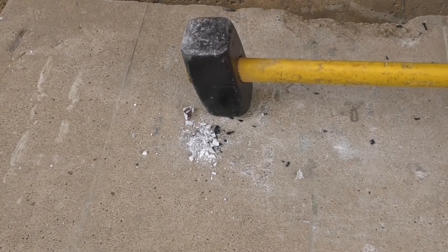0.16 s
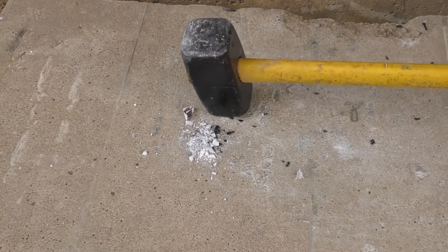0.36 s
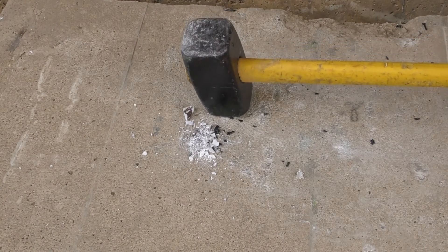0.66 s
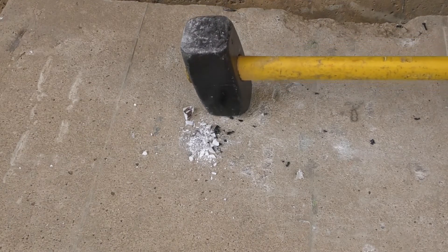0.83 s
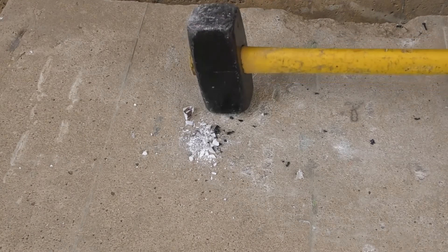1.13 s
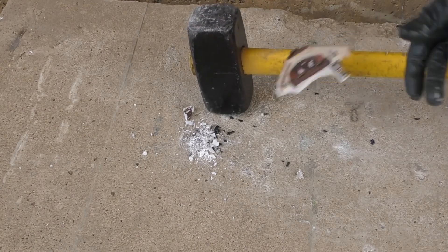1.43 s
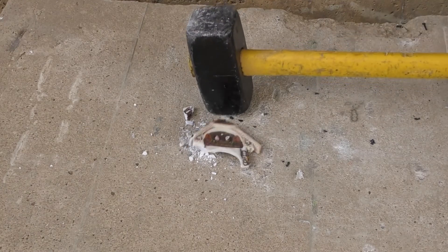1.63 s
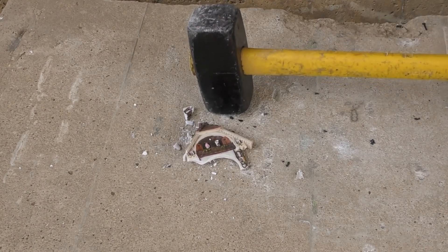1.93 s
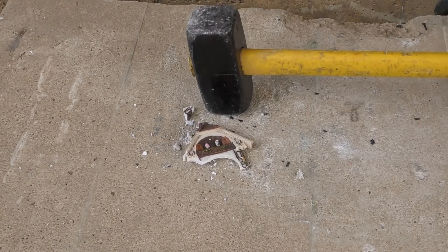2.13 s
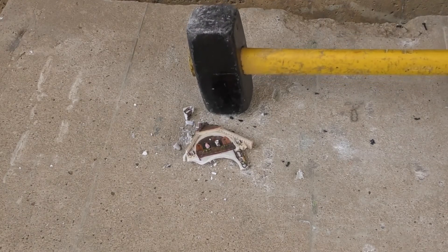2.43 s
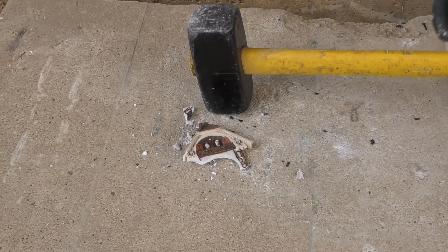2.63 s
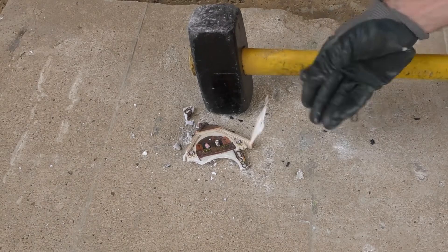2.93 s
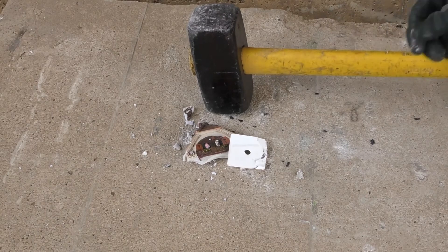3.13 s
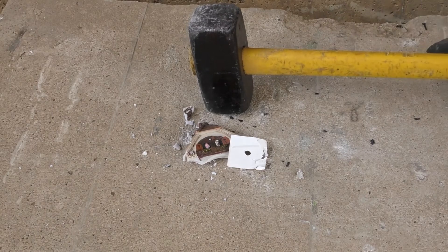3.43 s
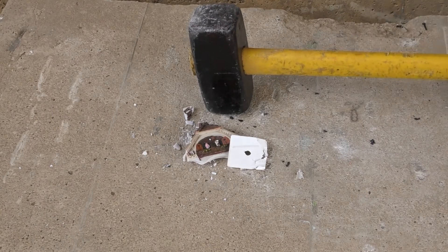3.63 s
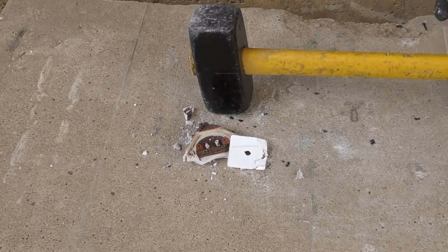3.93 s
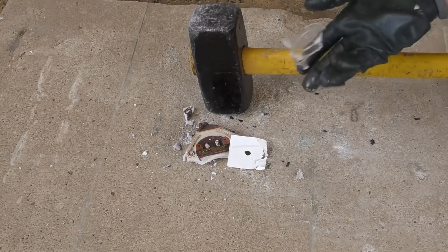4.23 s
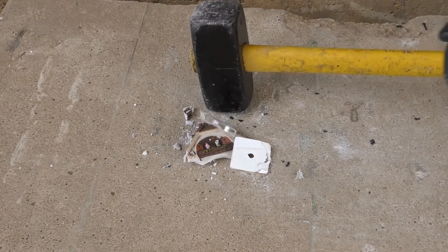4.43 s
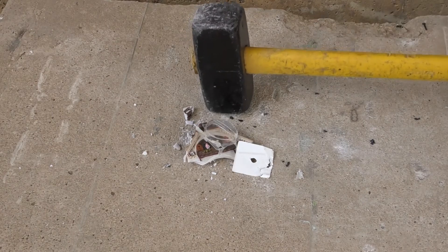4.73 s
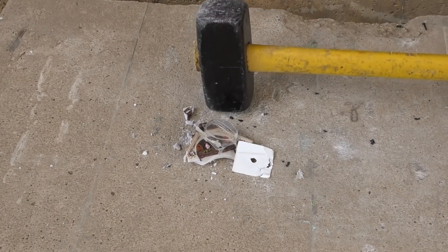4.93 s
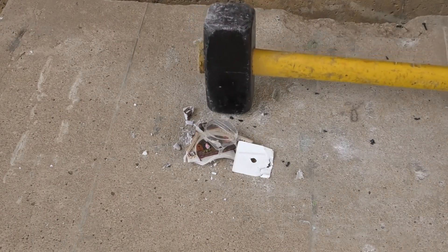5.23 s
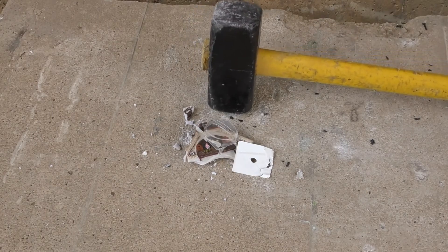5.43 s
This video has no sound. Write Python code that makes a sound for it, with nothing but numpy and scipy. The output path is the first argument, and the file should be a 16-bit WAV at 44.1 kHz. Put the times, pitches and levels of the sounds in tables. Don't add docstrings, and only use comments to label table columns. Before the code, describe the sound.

Broken plastic and ceramic scraps clack and rattle onto concrete in separate drops, over faint glove rustle and low distant traffic rumble.

```python
import sys
import numpy as np
from scipy import signal
from scipy.io import wavfile
from scipy.ndimage import uniform_filter1d

SR = 44100
rng = np.random.default_rng(int(sys.argv[2]) if len(sys.argv) > 2 else 0)


def to_wav(sig):
    pcm = np.clip(np.atleast_2d(sig), -1, 1) * 32767
    pcm = np.round(pcm).astype(np.int16)
    wavfile.write(sys.argv[1], SR, pcm.T)


def field_ratio(decibels):
    return 10 ** (np.asarray(decibels, dtype=float) / 20)


N = 246078

# t/s, level/dB
TRAFFIC_LEVEL = [(0, -37), (.25, -37), (.59, -32.5), (.9, -41.5), (1.41, -37.5), (1.46, -37.5), (1.57, -38),
                 (1.61, -47), (2.5, -46), (2.94, -42), (3.6, -40), (3.95, -37), (4.21, -35), (4.27, -33.5),
                 (4.4, -38.5), (4.62, -40), (4.69, -35.5), (4.82, -40), (5.58, -42.5)]
# t/s, level/dB
HEAVY_LEVEL = [(0, 10.5), (.17, -8.5), (.5, -3), (.95, 6), (1.3, -2), (1.75, 2.5), (2.45, -6), (2.75, 2),
               (3.0, -4), (3.25, 2.5), (3.6, 1), (3.72, -10), (4.15, -3), (4.35, -1.5), (4.75, -1.5),
               (4.92, -6), (5.3, -2.5), (5.5, 7)]
# f/Hz, density/dB per Hz
RUMBLE_SPECTRUM = [(8.2, -48), (14, -24), (21, -28), (37, 8), (48, -15), (92, 2), (118, -7.5), (198, 0.5),
                   (316, -7), (380, -22.5), (420, -36.5), (550, -41), (920, -120)]
# f/Hz, density/dB per Hz
ROAD_SPECTRUM = [(350, -73), (590, -19.5), (677, -7.5), (800, -14.5), (986, -3.5), (1160, -6), (1360, -4),
                 (1490, -4.5), (1620, -13.5), (1770, -8.5), (1900, -11.5), (2470, -16), (4180, -120)]
# f/Hz, density/dB per Hz
HOLLOW_SPECTRUM = [(380, 6), (430, -4.5), (580, -1), (700, 5.5)]
# t/s, strength/1, gate hold/s
DUCKS_AFTER_DROPS = [
    (1.601, 0.86, 2.2),
    (4.441, 0.22, 0.024),
]
# t/s, activity level/dB, pressure/dB (harder = coarser)
GLOVE_MOTION = [(0, -31, -7.5), (.3, -47, -3.5), (.41, -24, -9), (.56, -44.5, -5.5), (.78, -41, -8),
                (.86, -47.5, -6), (1.37, -47, -8), (1.62, -53, -7), (1.75, -45, 1), (1.95, -60.5, -12),
                (2.27, -39.5, -11.5), (2.58, -55.5, -4.5), (3.2, -52, -3.5), (3.56, -44.5, -5),
                (3.86, -49.5, -8.5), (4.05, -48.5, -4.5), (4.48, -52, -3), (4.6, -38.5, -2.5),
                (4.85, -53, -1.5), (5.4, -49.5, -2.5)]
# t/s, length/s, fine level/dB, coarse level/dB re fine
GLOVE_STROKES = [(0.402, 0.032, -21, -16), (.425, 0.038, -29, -11), (.49, 0.15, -39, -25),
                 (0.648, .14, -34, -7.5), (0.778, 0.087, -43, -2), (0.893, 0.071, -39, -13),
                 (1.029, 0.072, -45, -9), (1.606, 0.056, -44.5, 6), (1.637, 0.078, -53, -11),
                 (2.112, 0.03, -45, -23), (2.27, 0.1, -39, -9), (2.367, 0.083, -44.5, -8),
                 (2.515, 0.076, -43, -9), (2.6, 0.067, -51, -5), (2.824, 0.077, -46.5, -8),
                 (3.23, 0.056, -51, -19), (3.39, 0.15, -36.5, -8), (3.547, 0.067, -50, -1),
                 (3.638, 0.074, -35.5, -6.5), (3.78, 0.042, -43.5, -8), (3.927, 0.035, -46, -3.5),
                 (4.467, 0.037, -33, -1), (4.455, 0.12, -38, -0.5), (4.625, 0.13, -40.5, -18),
                 (4.92, 0.12, -45, -8), (5.115, 0.066, -48, -21), (5.184, 0.12, -48, -10),
                 (5.393, 0.061, -46, -1)]
# f/Hz, density/dB per Hz
FINE_SPECTRUM = [(4120, -25), (7700, -9.5), (9500, -0.5), (11000, 1), (15000, -6), (15850, -9),
                 (15950, -60), (16500, -80)]
COARSE_SPECTRUM = [(1940, -4), (3300, 7.5), (3950, 8.5), (4250, 6.5), (4750, 3.5), (5300, 7), (5750, 5.5),
                   (6400, 0.5), (7300, 3.5), (9360, 5.5), (15800, -120)]
DULL_SPECTRUM = [(1060, -13.5), (1800, 2.5), (2440, 6.5), (2680, 6.5), (2910, 6.5), (3400, -7.5),
                 (4420, -41), (7480, -120)]
# t/s, length/s, f/Hz, width/Hz, level/dB
RATTLES_AND_BUMPS = [(.47, .105, 6150, 170, -41), (.062, .022, 2400, 300, -29), (1.612, .023, 4400, 910, -36),
                     (1.617, .016, 5300, 250, -32), (4.572, .026, 2250, 120, -35),
                     (4.604, .034, 3200, 1300, -37), (1.86, .25, 2500, 700, -51), (.42, .05, 6200, 250, -37),
                     (.6, .07, 2860, 160, -44.5), (.77, .05, 2860, 490, -41.5), (4.3, .12, 1030, 57, -39.5),
                     (.25, .038, 560, 500, -40), (1.085, .065, 215, 5.9, -29), (4.49, .09, 3500, 1100, -41),
                     (.47, .15, 2100, 900, -37), (1.15, .1, 2200, 500, -48), (1.37, .16, 1880, 160, -45),
                     (4.66, .097, 5500, 2700, -45), (2.44, .17, 1050, 260, -49.5), (.46, .13, 10100, 600, -40),
                     (.48, .16, 2880, 220, -41.5), (.396, .014, 3700, 150, -31), (.396, .03, 2500, 200, -34),
                     (.404, .022, 5300, 200, -34), (4.525, .045, 6800, 2500, -44),
                     (4.475, .025, 3400, 900, -37), (4.05, .05, 85, 20, -33), (5.4, .05, 250, 50, -34),
                     (5.04, .07, 70, 20, -38), (.02, .02, 700, 500, -33), (.93, .12, 250, 40, -38),
                     (.86, .38, 1080, 150, -44), (.99, .08, 1950, 200, -47), (.25, .11, 1100, 200, -43),
                     (0, .03, 6500, 900, -40), (3.43, .08, 4050, 250, -48), (3.56, .05, 4050, 250, -50),
                     (3.64, .05, 4050, 250, -47), (5.412, .022, 5200, 2200, -36), (2.29, .17, 5400, 600, -54),
                     (1.95, .3, 2950, 450, -56), (.376, .1, 6250, 200, -41), (.375, .03, 10000, 500, -37)]
# t/s, level/dB
GRIT_TICKS = [(.004, -54), (.2064, -53), (0.247, -42), (.3167, -44), (.9048, -43.5), (1.043, -44),
              (1.2305, -49), (1.3845, -44.5), (2.1314, -50), (2.175, -61), (2.5326, -50), (3.2024, -60),
              (3.3565, -48), (3.7973, -44.5), (3.945, -55), (4.1175, -47), (4.8903, -43), (4.946, -50),
              (5.1357, -48)]
# t/s, body level/dB, f/Hz, edge level/dB re body, ring/ms
GATHERED_CONTACTS = [(.0329, -11, 2360, -25, 26), (.033, -12.5, 2800, -29, 22), (.031, -20, 6830, 8, 18),
                     (.0332, -11, 1600, -21, 22), (.0692, -22, 2280, -18, 33), (.0895, -25, 2370, -17, 65),
                     (.1048, -29, 5000, -3, 28), (.105, -25.5, 8600, -13, 30), (.1459, -33, 2350, -17, 59),
                     (.1699, -31.5, 6440, 9, 29), (.170, -29.5, 4080, -15, 32), (.354, -34, 5300, 8, 30),
                     (.3733, -25, 3700, -3, 17), (.3744, -17.5, 6380, 3.5, 28), (.3975, -19, 7000, -1, 39),
                     (.4012, -26, 3700, 11, 40), (.404, -25, 2460, 12, 37), (.4067, -23, 5430, 16, 37),
                     (.4095, -38, 7000, 19, 15), (.4122, -14, 6200, -2, 49), (.4134, -22, 3650, 4, 43),
                     (.4175, -28, 5400, 4, 30), (.4228, -24, 5530, 12, 25), (.429, -30, 6200, 6, 20),
                     (.4412, -20, 2500, 3, 18), (.4448, -36, 6140, 16, 30), (.449, -28, 6200, 0, 35),
                     (.4604, -21, 6200, 8, 26), (.461, -27, 3700, -15, 20), (.595, -26, 1970, -6, 53),
                     (.652, -24, 6340, -6, 29), (.6612, -20.5, 2820, 1, 48), (.7475, -10, 5660, -8, 25),
                     (.7476, -17.5, 2030, -16, 30), (.7476, -11.5, 11800, -11, 25),
                     (.7476, -14, 2860, -20, 30), (.7837, -30, 2960, -3, 31), (1.0815, -42, 6400, -12, 30),
                     (1.252, -36.5, 3030, -12, 38), (1.279, -55, 6000, 12, 30), (1.292, -62, 6000, 8, 30)]
# t/s, body level/dB, f/Hz, edge level/dB re body, ring/ms
BIG_CONTACTS = [(1.5648, -20, 4930, 0, 16), (1.565, -24, 1410, -20, 18), (1.5654, -21, 2880, -11, 17),
                (1.5672, -18, 5270, -10, 22), (1.5729, -11.5, 2750, -12, 48), (1.5732, -8, 2270, -22, 30),
                (1.5822, -5, 3120, -7.5, 18), (1.5865, -4.5, 5200, -4, 11), (1.587, -7, 6660, -18, 22),
                (1.5917, -15, 2480, -25, 20), (1.5922, -13, 5200, -6, 11), (1.5935, -28, 3060, -17, 48),
                (1.6132, -26, 4100, -17, 11), (1.6158, -23, 3470, -15, 19), (1.6176, -32, 4800, -11, 10),
                (1.6195, -27, 3400, -15, 23), (1.6238, -24, 5300, -10, 33), (1.627, -24.5, 5070, -13, 29),
                (1.631, -31, 3220, -2, 19), (1.702, -51, 3000, 22, 19), (1.72, -31, 5200, 1, 23),
                (1.746, -43, 5340, 18, 30), (1.7995, -45.5, 5400, 28.5, 20), (2.3072, -36, 5427, 9.5, 19),
                (2.355, -42, 5660, 11, 26), (2.4054, -38, 5230, 4, 19)]
# t/s, body level/dB, f/Hz, edge level/dB re body, ring/ms
PLATE_CONTACTS = [(3.009, -22.5, 3570, -2, 18), (3.0093, -40, 3030, -17, 18), (3.0257, -30, 4040, 2, 22),
                  (3.0405, -40, 3950, -15, 28), (3.0528, -34, 4240, 12.5, 25), (3.063, -41, 4000, -15, 24),
                  (3.0834, -41, 2130, 0, 31), (3.1137, -38, 2000, -4, 28), (3.3293, -47.5, 2290, 13, 12),
                  (3.3622, -39, 3500, 3, 16), (3.3916, -36, 3570, 2, 15), (3.395, -33, 3540, 0, 22),
                  (3.665, -40, 3940, -1, 16), (3.672, -42, 5300, 4, 16), (3.677, -40, 4000, 4, 12),
                  (3.706, -53, 4000, 12, 20)]
# t/s, body level/dB, f/Hz, edge level/dB re body, ring/ms
LAST_CONTACTS = [(4.4292, -18.5, 5500, 4, 41), (4.4297, -29, 3120, -15, 42), (4.433, -26, 4370, 5, 35),
                 (4.4368, -19, 7500, 12, 18), (4.4388, -12, 3190, 3, 46), (4.439, -15, 5170, -15, 17),
                 (4.4412, -13, 7300, 0, 20), (4.4436, -12.5, 7420, -3, 23), (4.444, -14.5, 3210, -1, 33),
                 (4.4425, -18, 1580, -19, 18), (4.4475, -15.5, 4500, -4, 20), (4.4505, -21.5, 5670, 3, 62),
                 (4.453, -33, 3020, 0, 27), (4.485, -31, 6400, -5, 40), (4.487, -27, 3300, -7, 32),
                 (4.5174, -27.5, 6660, 9, 40), (4.5694, -26, 4200, 10, 42), (4.57, -16.5, 3450, -4, 10),
                 (4.571, -19.5, 6750, -12, 31), (4.6044, -25, 2980, -6, 42), (4.6085, -23, 2920, -4, 26),
                 (4.624, -30, 2900, -8, 33), (5.4035, -42, 5100, 5, 30), (5.414, -41, 5550, 2, 27),
                 (5.4235, -32, 4280, -9, 38), (5.427, -26.5, 5520, -8, 29)]
# t/s, level/dB, push/ms, pull/ms
AIR_PUSHES = [
    (1.5738, -12.5, 0.35, 2.75),
    (1.583, -11, 1.1, 3.9),
    (1.5872, -21, 2.4, 3),
    (1.596, -47, 4.8, 32),
    (0.62, -25.5, 3.8, 8.2),
    (.0325, -30, 0.42, 0.61),
    (4.442, -30, 0.75, 3),
]
# t/s, level/dB, f/Hz
EDGE_SNAPS = [(.4015, -11, 11000), (.4075, -10, 9500), (.4235, -12, 11500), (.4454, -18, 10500),
              (.7481, -8, 8500), (1.5736, -4, 12500), (1.5741, -7, 14400), (1.5827, -3, 12000),
              (1.5832, -5, 14400), (2.3074, -24, 9000), (4.118, -32, 6000), (4.4296, -2, 13000),
              (4.4302, -10, 14500), (4.4392, -7, 11000), (4.4446, -3, 13500), (4.5708, -12, 8000),
              (4.5702, -18, 14500), (.105, -26, 6500), (3.053, -26, 9000), (.4611, -13, 12000),
              (.4137, -10, 11500), (.4328, -20, 9000), (1.7465, -29, 11000), (1.7998, -20, 12000),
              (.17, -29, 9500), (.3748, -16, 11000), (3.3295, -33, 9000)]
# f/Hz, width/Hz, level/dB
SHELL_MODES = [(2380, 300, -47.5), (2800, 23, -43.5), (3020, 106, -41), (3270, 50, -48), (4280, 210, -50.5),
               (5280, 200, -42), (6740, 430, -50.5), (9800, 850, -44), (3700, 3100, -55)]
# f/Hz, density/dB per Hz
CAR_SPECTRUM = [(1900, -42), (2900, -1.5), (4160, 3.5), (5300, -5), (5900, -34), (7000, -60)]

ROAD_DB, ROAD_FOLLOW, HOLLOW_DB, HOLLOW_FOLLOW = -46, 0.6, -54.5, 0.04
RUMBLE_DUCK_DB, RUMBLE_BACK_S, ROAD_DUCK_DB, ROAD_BACK_S = 30, 0.1, 40.5, 0.23
GATE_DB, GATE_BACK_S, HEAVY_HZ, GUST_DB = 28, 0.84, 153, 1
DULL_DB, DULL_FOLLOW, DULL_PRESS = -54, 0.93, 0.72
GRIT_HZ, GRIT_EDGE_DB, GRIT_RING_MS = 2000, 9.5, 56
GATHERED_SIDE, BIG_SIDE, PLATE_SIDE, LAST_SIDE, GRIT_SIDE = 0.19, 0.28, 0.84, 0.47, 0.53
PORT_HZ, PORT_WIDTH_HZ = 10320, 1640
SNAP_MS, SHELL_S, SHELL_RESTS_S = 3.5, 1.6, 0.26
ENGINE_S, ENGINE_DB, ENGINE_RISE_DB_S, ENGINE_FALL_DB_S = 3.69, -40, 15.5, 72
ENGINE_HZ, ENGINE_SAG_HZ_S = 56.6, 0.555
CAR_S, CAR_DB, CAR_RISE_DB_S, CAR_FALL_DB_S = 3.94, -52.5, 10, 2.5


def evened(x):
    return x / np.sqrt(np.mean(x ** 2) + 1e-20)


def add(mix, s, sound):
    part = mix[max(round(s * SR), 0):][:len(sound)]
    part += sound[:len(part)]


def curve(rows, index):
    rows = np.array(rows)
    return np.interp(np.arange(N) / SR, rows[:, 0], rows[:, index])


def resonate(x, hz, width_hz):
    r = np.exp(-np.pi * width_hz / SR)
    return signal.lfilter([1, 0, -1], [1, -2 * r * np.cos(2 * np.pi * hz / SR), r * r], x)


def noise(spectrum, size, patchy_db, flicker_db, grain_db=0.):
    hop = size // 4
    frames, hz = N // hop + 5, np.fft.rfftfreq(size, 1 / SR)
    grains = field_ratio(grain_db * np.minimum(rng.exponential(1, frames * hop), 5))
    source = rng.standard_normal(frames * hop) * grains
    z = signal.stft(source, nperseg=size, noverlap=size - hop)[2]
    patches = uniform_filter1d(rng.standard_normal(z.shape), size=5, axis=0)
    patches = evened(uniform_filter1d(patches, size=10, axis=1))
    flicker = evened(uniform_filter1d(rng.standard_normal(z.shape[1]), size=8))
    f, db = np.transpose(spectrum)
    colour = np.interp(np.log(hz + 1), np.log(f), db, -120, -120)
    z = z * field_ratio(colour[:, None] + patchy_db * patches + flicker_db * flicker)
    return evened(signal.istft(z, nperseg=size, noverlap=size - hop)[1][:N])


def traffic():
    t, swing = np.arange(N) / SR, curve(TRAFFIC_LEVEL, index=1) + 40
    rumble_db = swing - 38.5
    road_db = ROAD_DB + ROAD_FOLLOW * swing
    gate = np.zeros(N)
    for s, strength, hold_s in DUCKS_AFTER_DROPS:
        since = np.maximum(t - s, 0)
        ducked = strength * (t > s)
        rumble_db = rumble_db - ducked * RUMBLE_DUCK_DB * np.exp(-since / RUMBLE_BACK_S)
        road_db = road_db - ducked * ROAD_DUCK_DB * np.exp(-since / ROAD_BACK_S)
        gate += (since > 0) * np.clip(1 - (since - hold_s) / (ducked * GATE_BACK_S + 1e-9), 0, 1)
    hollow_db = HOLLOW_DB + HOLLOW_FOLLOW * swing - GATE_DB * gate
    rumble = field_ratio(rumble_db) * noise(RUMBLE_SPECTRUM, size=2048, patchy_db=.9, flicker_db=3.4)
    deep = signal.sosfiltfilt(signal.butter(2, HEAVY_HZ, fs=SR, output="sos"), rumble)
    rumble = rumble + (field_ratio(curve(HEAVY_LEVEL, index=1)) - 1) * deep
    road = field_ratio(road_db) * noise(ROAD_SPECTRUM, size=1024, patchy_db=2.0, flicker_db=0.55)
    hollow = field_ratio(hollow_db) * noise(HOLLOW_SPECTRUM, size=2048, patchy_db=0.5, flicker_db=-3.2)
    return rumble + road + hollow


def rustle():
    busy, press = curve(GLOVE_MOTION, index=1), curve(GLOVE_MOTION, index=2)
    dull_db = DULL_DB + DULL_FOLLOW * (busy + 45) + DULL_PRESS * (press + 7)
    power = field_ratio(2 * np.array([busy - 1.5, busy + press, dull_db]))
    for s, length_s, fine_db, coarse_re_fine_db in GLOVE_STROKES:
        stroke = signal.windows.tukey(round(max(length_s, .01) * SR), .8) ** 2
        coarse_db = fine_db + coarse_re_fine_db
        for layer, db in zip(power, (fine_db, coarse_db, coarse_db - 7.0)):
            add(layer, s, field_ratio(2 * db) * stroke)
    fine = noise(FINE_SPECTRUM, size=256, patchy_db=1.7, flicker_db=1.5, grain_db=3)
    coarse = noise(COARSE_SPECTRUM, size=512, patchy_db=2.8, flicker_db=1.5, grain_db=2.6)
    dull = noise(DULL_SPECTRUM, size=512, patchy_db=.7, flicker_db=.6)
    return (np.sqrt(power) * [fine, coarse, dull]).sum(0)


def rattles():
    out = np.zeros(N)
    for s, length_s, hz, width_hz, db in RATTLES_AND_BUMPS:
        shake = resonate(rng.standard_normal(SR // 2), hz, width_hz)
        shake = evened(resonate(shake, hz, 2 * width_hz))[:round(length_s * SR)]
        fade = signal.windows.tukey(len(shake), .6) * np.linspace(1.2, .5, len(shake))
        add(out, s, field_ratio(db) * shake * fade)
    return out


def clack(body_db, hz, edge_db, ring_ms, side):
    noises, spread = rng.standard_normal((2, 2600)), rng.uniform(1.0, 1.01, size=10)
    t = np.arange(2600) / SR
    t60 = np.clip(ring_ms / 1000, .004, .1)
    rise = np.minimum(t / 0.0003, 1)
    blow = np.exp(-t / 0.0003)
    chatter = noises[0] * rise * (blow + 1.6 * field_ratio(-60 * t / (0.9 * t60)))
    chatter[4] += 14
    ring = resonate(chatter, hz, 4.2 / t60 + 60)
    neighbours = np.clip(hz * np.array([.72, .86, 1.2, 1.45, 1.8]) * spread[:5], 1400, 7500)
    others = sum(resonate(chatter, f, 1400) for f in neighbours)
    body = ring / abs(ring).max() + side * others / abs(others).max()
    body = body * np.exp(-(t / (.33 * t60)) ** 3)
    fizz = noises[1] * rise * (blow + 0.36 * field_ratio(-60 * t / (0.65 * t60)))
    fizz[4] += 1.5
    stiff_hz = np.array([10100, 10300, 9400, 11800, 12600]) * spread[5:]
    slivers = sum(resonate(fizz, f, 350) for f in stiff_hz)
    port = resonate(fizz, PORT_HZ, PORT_WIDTH_HZ)
    air = resonate(resonate(fizz, 11000, 5000), 11800, 9900)
    edge = evened(port) + 0.4 * evened(air) + 0.28 * evened(slivers)
    return field_ratio(body_db + 2.3) * body + field_ratio(body_db + edge_db + 7.0) * edge / abs(edge).max()


def contacts():
    out = np.zeros(N)
    grit = [(s, db, GRIT_HZ, GRIT_EDGE_DB, GRIT_RING_MS) for s, db in GRIT_TICKS]
    heaps = [(GATHERED_CONTACTS, GATHERED_SIDE), (BIG_CONTACTS, BIG_SIDE), (PLATE_CONTACTS, PLATE_SIDE),
             (LAST_CONTACTS, LAST_SIDE), (grit, GRIT_SIDE)]
    for heap, side in heaps:
        for s, body_db, hz, edge_db, ring_ms in heap:
            add(out, s + .0005, clack(body_db, hz, edge_db, ring_ms, side))
    return out


def yard(x):
    at = np.arange(150, SR // 2, 22)
    signs = rng.choice([-1., 1.], len(at))
    taps = np.zeros(SR)
    taps[at + rng.integers(0, 22, len(at))] = signs * field_ratio(-60 * at / SR / 1.3)
    return signal.fftconvolve(x, taps / np.linalg.norm(taps))[:N]


def air_pushes():
    out, t = np.zeros(N), np.arange(SR) / SR
    onset = np.sin(np.pi / 2 * np.minimum(t / 0.00065, 1)) ** 2
    for s, db, push_ms, pull_ms in AIR_PUSHES:
        swing = (1 - 1000 * t / push_ms) * np.exp(-(1000 * t / pull_ms) ** 2)
        add(out, s, field_ratio(db) * swing * onset)
    return out


def snaps():
    out, t = np.zeros(N), np.arange(400) / SR
    for s, db, hz in EDGE_SNAPS:
        turn = 2 * np.pi * hz * t
        crack = np.sin(turn) + 0.37 * np.sin(0.694 * turn) + 0.33 * np.sin(1.1 * turn)
        add(out, s, field_ratio(db - 60000 * t / SNAP_MS) * crack / 1.4)
    return out


def shell():
    out, t = np.zeros(N), np.arange(SR) / SR
    for hz, width_hz, db in SHELL_MODES:
        t60 = 2.2 * (3000 / hz) ** 0.2
        rests_s = SHELL_RESTS_S * (3000 / hz) ** 0.83 + 0.22
        wobble_db = 3.4 * evened(uniform_filter1d(rng.standard_normal(SR), size=900))
        ring = resonate(rng.standard_normal(SR), hz, width_hz)
        ring = evened(resonate(ring, hz, 3 * width_hz))
        envelope = np.minimum(t / 0.025, 1) / (1 + (t / rests_s) ** 6)
        add(out, SHELL_S, ring * field_ratio(db + wobble_db - 60 * t / t60) * envelope)
    return out


def engine():
    near = np.arange(N) / SR - ENGINE_S
    db = ENGINE_DB + np.minimum(ENGINE_RISE_DB_S * near, -ENGINE_FALL_DB_S * near)
    return np.sin(2 * np.pi * np.cumsum(ENGINE_HZ - ENGINE_SAG_HZ_S * near) / SR) * field_ratio(db)


def car():
    near = np.arange(N) / SR - CAR_S
    db = CAR_DB + np.minimum(CAR_RISE_DB_S * near, -CAR_FALL_DB_S * near)
    return field_ratio(db) * noise(CAR_SPECTRUM, size=1024, patchy_db=2.4, flicker_db=1)


def scene():
    far = traffic() + engine() + car()
    scraps = rattles() + contacts()
    near = rustle() + scraps + field_ratio(-28.0) * yard(scraps) + air_pushes() + shell()
    drift = uniform_filter1d(uniform_filter1d(rng.standard_normal(N), size=1500), size=1500)
    gusts = field_ratio(GUST_DB * evened(drift))
    dulled = signal.oaconvolve(gusts * far + near, signal.firwin(511, 15870, fs=SR), "same")
    return (dulled + snaps())[None]


def top_cut(x):
    return signal.sosfilt(signal.butter(12, 16720, fs=SR, output="sos"), x)


def record(dry):
    edge = signal.firwin(255, 16600, fs=SR)[None]
    limited = np.clip(dry, -.96, .96)
    return top_cut(signal.oaconvolve(limited, edge, "same"))


dry = scene()
out = record(dry)
to_wav(out)
```